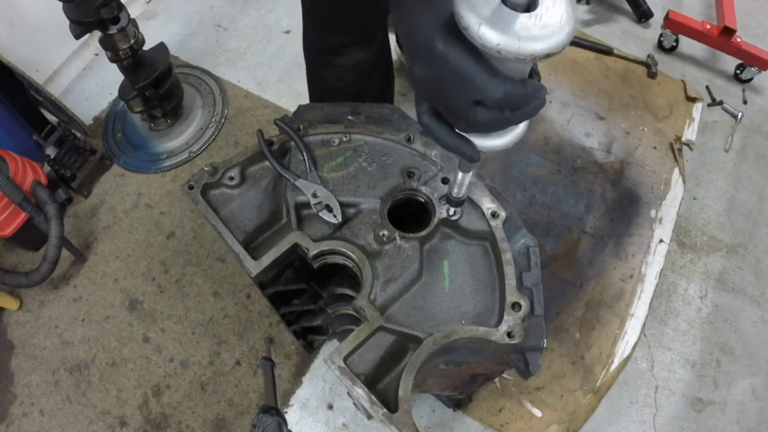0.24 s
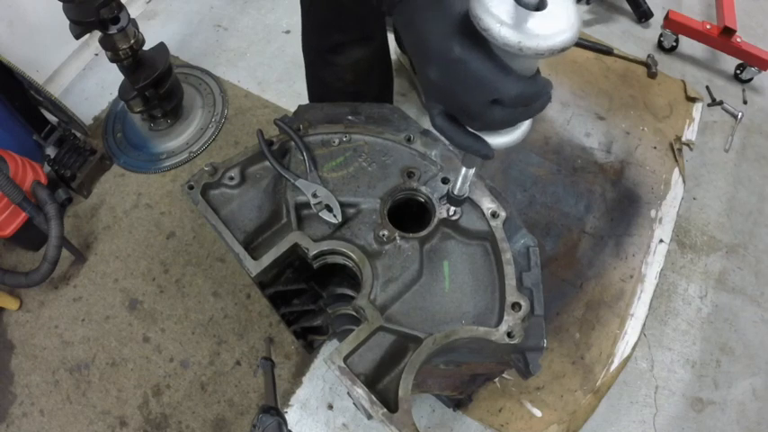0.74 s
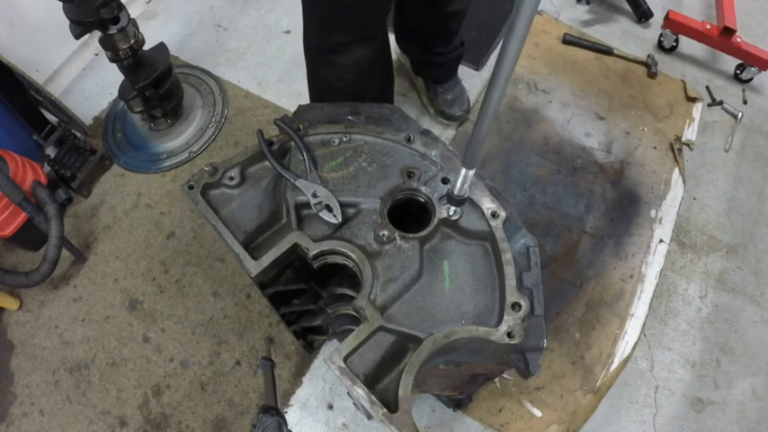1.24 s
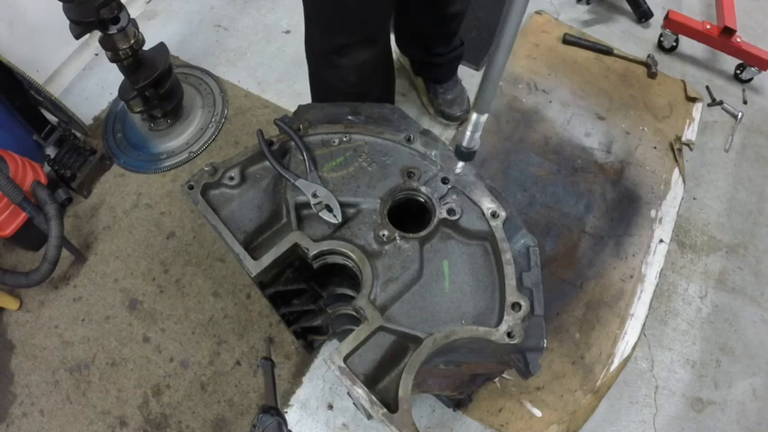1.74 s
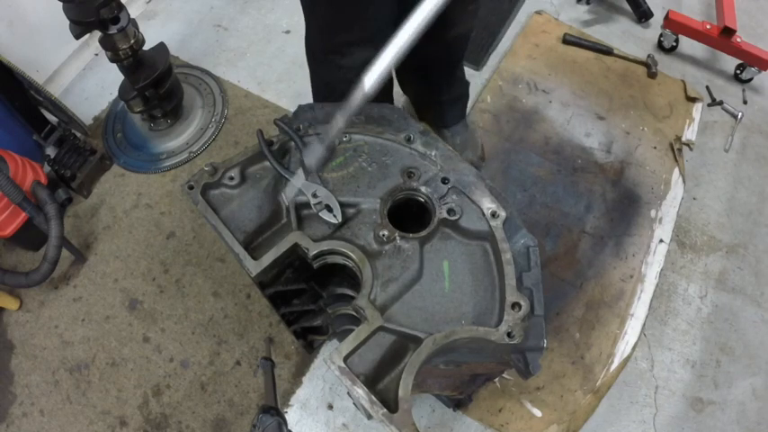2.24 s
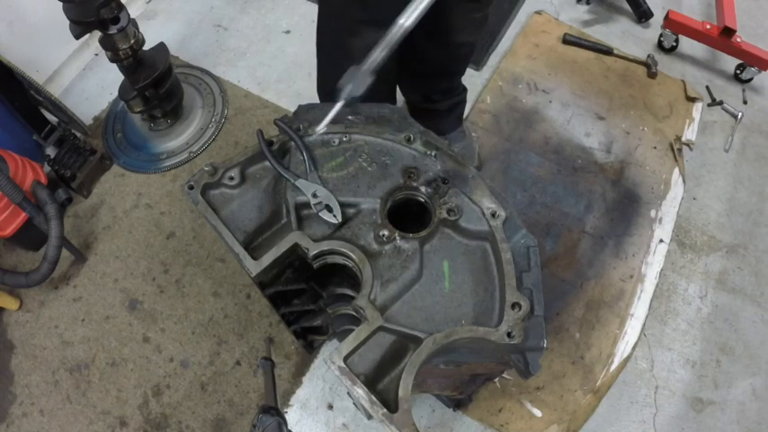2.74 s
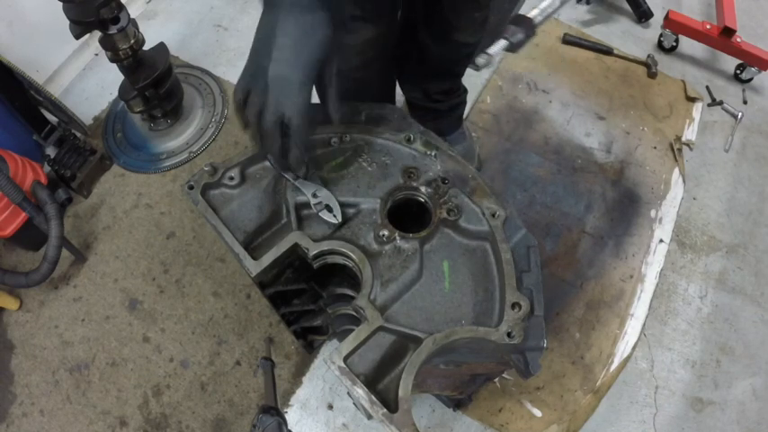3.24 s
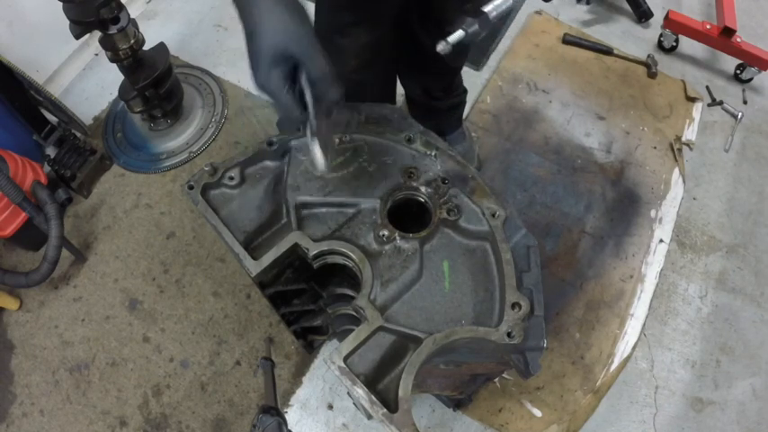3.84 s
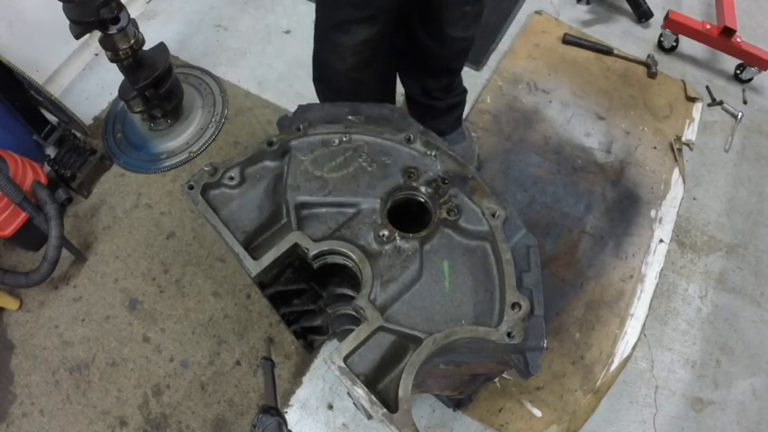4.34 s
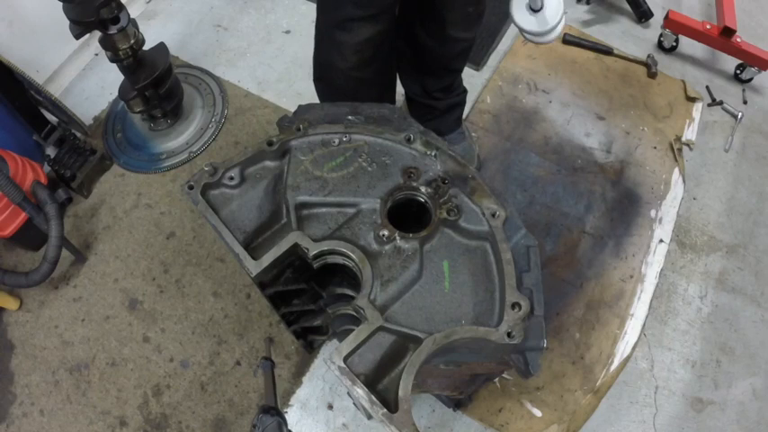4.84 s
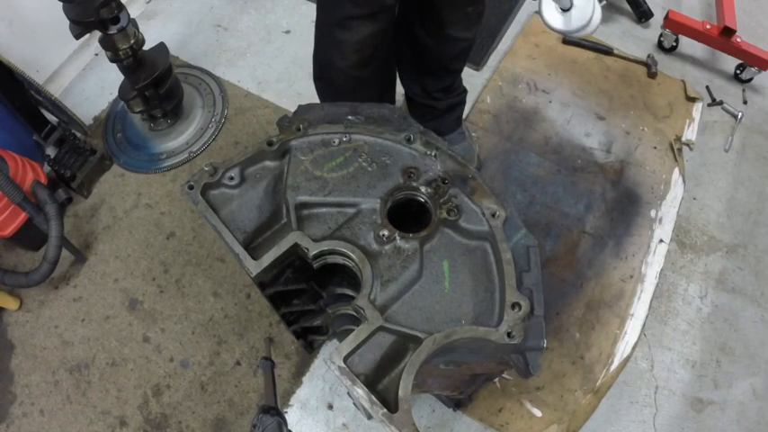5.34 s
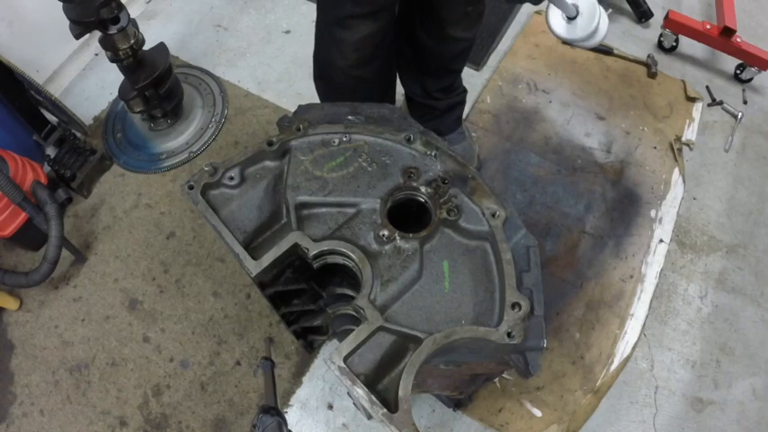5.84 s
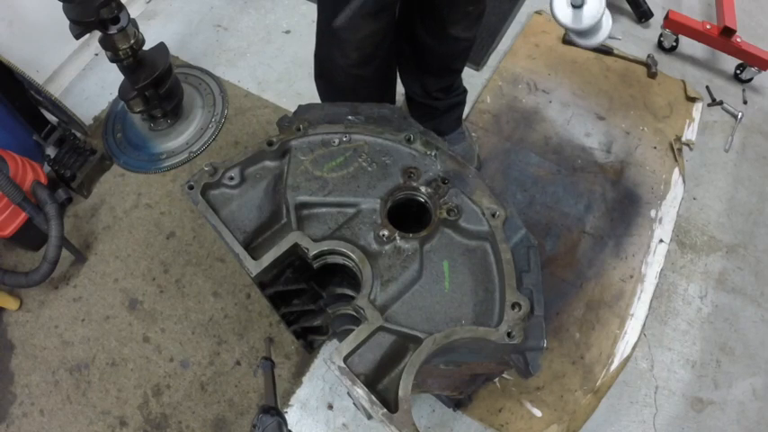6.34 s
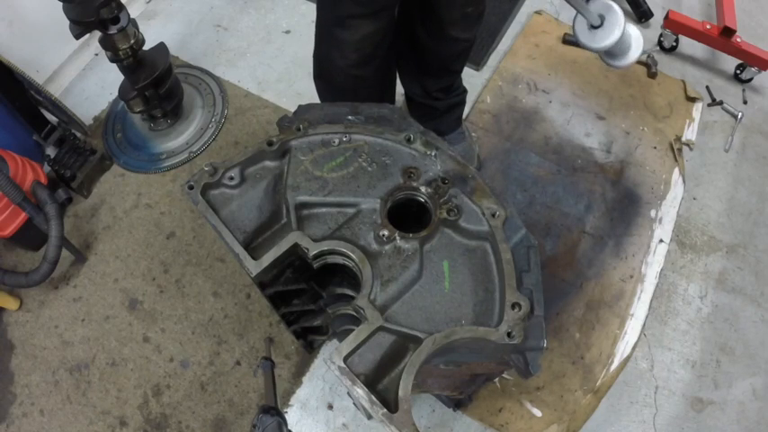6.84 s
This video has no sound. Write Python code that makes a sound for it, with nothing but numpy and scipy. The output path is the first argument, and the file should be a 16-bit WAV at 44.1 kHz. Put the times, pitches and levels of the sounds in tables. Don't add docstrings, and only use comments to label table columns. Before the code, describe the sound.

A low building hum and a very faint high whine run throughout a hard, reverberant workshop, heard close on a camera microphone. A tick and sleeve rustle open it, with small creases around 0.25 s. From about 0.6 s a weight scrapes softly on a rod, growing to a gritty, singing rub near 1.0 s, and slams at 1.17 s with a dull floor thud and ringing casting. Another scrape leads to the loudest, sharpest slam at 1.66 s, with clanks to 1.75 s; the level ducks and recovers over about a second. A tap at 1.9 s, a slide back, then a bright ringing clank with bounces at 2.38 s. Loose knocks and rattles fall at 2.75-2.9 s, a medium ringing tool clank at 3.43 s, a soft nudge at 3.68 s. Afterwards quiet rustling, glove drags, dry ticks and a short damped snap at 5.75 s, last clicks near 6.5 s, then hum.

```python
import sys
import numpy as np
from scipy import signal
from scipy.fft import rfft, irfft, next_fast_len
from scipy.io import wavfile
from scipy.ndimage import uniform_filter1d, map_coordinates

SR = 44100
rng = np.random.default_rng(int(sys.argv[2]) if len(sys.argv) > 2 else 0)


def master(y):
    cut = np.clip(np.atleast_2d(y).T, -1, 1)
    pcm = np.round(cut * 32767)
    wavfile.write(sys.argv[1], SR, pcm.astype(np.int16))


def ratio(d):
    e = np.asarray(d, float) / 20
    return 10 ** e


N = 313330


def colour(x, points, tilt_db=0.):
    hz, db = np.transpose(points)
    octave = np.log2(np.maximum(np.arange(513) * SR / 1024, 20))
    gain_db = np.interp(octave, np.log2(hz), db) + tilt_db * (octave - np.log2(3000))
    cepstrum = irfft(np.log(ratio(gain_db)))
    cepstrum[1:512] *= 2
    cepstrum[513:] = 0
    taps = irfft(np.exp(rfft(cepstrum)))
    return signal.fftconvolve(x, taps / np.sqrt(np.sum(taps ** 2)))[:len(x)]


def shaped(points):
    hz, db = np.transpose(points)
    size = next_fast_len(N)
    bins = np.maximum(np.arange(size // 2 + 1) * SR / size, 1)
    gain = ratio(np.interp(np.log(bins), np.log(hz), db))
    x = irfft(rfft(rng.standard_normal(size)) * gain, size)[:N]
    return x / np.std(x)


def walk(rate):
    hold = int(SR / rate)
    steps = np.repeat(rng.standard_normal(N // hold + 1), hold)
    return 1.2 * uniform_filter1d(uniform_filter1d(steps, hold), hold)[:N]


def add(out, s, sound):
    i = max(int(s * SR), 0)
    out[i:i + len(sound)] += sound[:N - i]


def strokes(rows, size=1):
    rows = np.array(rows)
    t = np.arange(0, N, size) / SR
    speed = np.array([np.interp(t, np.sort(row[:3]), [0, 1, 0]) for row in rows])
    return speed, rows[:, 3:4]


def effort(rows, power):
    speed, db = strokes(rows, size=8)
    energy = np.sum((ratio(db) * speed ** power) ** 2, axis=0)
    return np.repeat(np.sqrt(energy), 8)[:N]


def singing(hz, width, db):
    friction = rng.standard_normal(N) * ratio(3.8 * walk(40))
    mode = signal.lfilter(*signal.iirpeak(hz, hz / (.9 * width), SR), friction)
    mode = signal.lfilter(*signal.iirpeak(hz, hz / (5 * width), SR), mode)
    return ratio(db) * np.sqrt(width) * mode / np.std(mode) / 20


def bent(x, share):
    return map_coordinates(x, [np.arange(N) + np.cumsum(share)], order=1, mode="mirror")


def shop():
    # (frequency [Hz], level [dB per Hz])
    hum_spectrum = [(12, -31.5), (20, -1), (101, -3.5), (347, -13), (472, -14), (873, -18), (949, -16.5),
                    (1120, -21.5), (2390, -26), (2990, -28), (3840, -30.5), (4420, -32.5), (5850, -35.5),
                    (14300, -49), (16000, -67.5)]
    hum = ratio(-52 + .5 * walk(3.4)) * shaped(hum_spectrum)
    whine_db = -95.5 + 4.5 * walk(9)
    return hum + ratio(whine_db) * np.sin(2 * np.pi * 14200 * np.arange(N) / SR)


def room(x):
    # (frequency [Hz], t60 [s])
    room_t60 = [(300, 1), (1000, 0.73), (2500, 0.38), (5000, 0.49), (9000, 0.33), (14000, .22)]
    t = np.arange(SR) / SR
    hz, t60 = np.transpose(room_t60)
    tail = 0
    for centre in 120 * 2 ** np.arange(0, 7.1, .5):
        band = signal.butter(2, [centre / 2 ** .25, centre * 2 ** .25], "bandpass", fs=SR, output="sos")
        fall = np.log(1000) / np.interp(np.log(centre), np.log(hz), t60)
        echoes = signal.sosfilt(band, rng.standard_normal(SR))
        tail = tail + min(centre / 1200, 1) * echoes * np.exp(-fall * t)
    tail *= 1 - np.exp(-t / 0.001)
    return signal.fftconvolve(x, tail / np.sqrt(np.sum(tail ** 2)))[:N]


def sleeves():
    # (start [s], fastest [s], stop [s], level when fastest [dB])
    sleeve_moves = [(-.02, .001, 0.027, -53), (.15, .28, 0.34, -63.5), (.36, .43, 0.47, -59),
                    (2.93, 3.055, 3.3, -57), (4.1, 4.14, 4.2, -68), (4.2, 4.37, 5, -65.5),
                    (4.5, 4.63, 4.79, -62), (4.92, 4.98, 5.07, -59.5), (5.05, 5.3, 5.1, -68),
                    (5.37, 5.39, 5.46, -58), (4.84, 4.87, 4.9, -67.5), (5.72, 5.76, 5.8, -68),
                    (6.24, 6.25, 6.33, -67.5), (6.36, 6.378, 6.9, -71), (6.48, 6.5, 7.1, -70.5),
                    (6.54, 6.55, 6.6, -74)]
    crease_moves = [
        (.215, .235, 0.22, -64),
        (.25, .257, 0.24, -54),
        (.276, .286, 0.3, -56),
        (.3, .305, 0.35, -67),
        (.4, .42, 0.38, -76),
    ]
    drag_moves = [
        (2.88, 3.12, 5.1, -57),
        (3.7, 3.92, 3.96, -68.5),
        (4.0, 4.26, 4.4, -64),
        (4.93, 5.16, 5.37, -60.5),
        (5.22, 5.4, 5.57, -59.5),
    ]
    # (frequency [Hz], level [dB per Hz])
    cloth_spectrum = [(2240, -12.5), (3800, 9), (4640, -10), (6270, 9.5), (7740, -10), (10000, -4),
                      (14200, -11), (15500, -4)]
    stiff_spectrum = [(2000, -30), (3500, -2), (5000, -14), (6500, 2), (7800, -10), (9500, -4),
                      (11500, -13), (14000, -5), (15500, -10)]
    grip_spectrum = [(1000, -46), (1700, -22), (2210, 2.5), (2660, -9), (3590, -4.5), (4380, -12),
                     (6030, -22.5), (15000, -29)]
    cloth = effort(sleeve_moves, .92) * ratio(1.0 * walk(98)) * shaped(cloth_spectrum)
    creases = effort(crease_moves, .6) * ratio(2.5 * walk(300)) * shaped(stiff_spectrum)
    drag = uniform_filter1d(effort(drag_moves, 0.72), size=3000)
    return cloth + creases + drag * ratio(2.0 * walk(43)) * shaped(grip_spectrum)


def ticks():
    # (time [s], peak [dB], centre [Hz], 6 kHz region [dB], 12 kHz region [dB])
    clicks = [(0.0094, -45, 2610, 1, -8), (0.2565, -54, 2280, 1.5, 3), (2.7097, -47, 3580, 0, 7),
              (3.0772, -43, 2290, -40, -36), (4.1391, -52.5, 2195, 0, -20), (4.9727, -50, 3450, 4, -20),
              (5.3885, -45, 2190, -3.5, -12), (5.675, -45, 2800, -4, -31.5), (6.2475, -59, 2590, -5, -22),
              (6.3674, -48, 3360, -18.5, -22.5), (6.549, -44, 4000, -6, -21.5)]
    out, t = np.zeros(N), np.arange(1500) / SR
    for s, peak_db, hz, mid_db, top_db in clicks:
        points = [(hz / 3, -18), (hz / 1.4, -2), (hz, 0), (4800, mid_db - 18), (6800, mid_db),
                  (12000, top_db), (16000, top_db - 14)]
        click = colour(rng.standard_normal(len(t)) * np.exp(-t / 0.0034), points)
        add(out, s, ratio(peak_db - 9.5) * click / np.std(click[:100]))
    return out


def thumps():
    # (time [s], level [dB], frequency [Hz], t60 [s])
    knocks = [
        (1.172, -34.5, 51.67, 0.46),
        (1.658, -33, 150, 0.051),
        (1.658, -28, 260, 0.062),
        (1.659, -25, 640, .04),
        (2.384, -41, 400, 0.087),
    ]
    out, t = np.zeros(N), np.arange(SR) / SR
    for s, db, hz, t60 in knocks:
        add(out, s, ratio(db) * np.exp(-np.log(1000) * t / t60) * np.sin(2 * np.pi * hz * t))
    return out


def slide():
    # (start [s], fastest [s], stop [s], level when fastest [dB], modes under 3 kHz [dB])
    stroke_rows = [(.58, .62, 0.69, -58, -1.5), (.67, .71, 0.92, -61, -2), (0.927, 1.03, 1.7, -38, -1.75),
                   (1.082, 1.155, 1.16, -31, -0.5), (1.3, 1.392, 1.47, -47, 1.1),
                   (1.41, 1.47, 1.54, -43.5, -3), (1.549, 1.628, 1.657, -37.5, 0.6),
                   (1.931, 2.07, 2.12, -41.5, 1.5), (2.13, 2.16, 2.23, -54, 2),
                   (2.217, 2.35, 2.41, -36.5, -2.5), (2.857, 2.9, 2.97, -50.5, 4),
                   (3.376, 3.428, 3.35, -53.5, 9)]
    # (frequency [Hz], width [Hz], level [dB])
    weight_modes = [(875, 97, -12.5), (1600, 60, -12), (1800, 60, -7), (2395, 60, -10.5), (2655, 90, -2),
                    (3300, 110, -13), (4738, 80, -7), (5240, 27, -25.5), (5950, 62, -7.5),
                    (6500, 180, -21.5), (6940, 82, -19), (8706, 90, -27), (9600, 80, -34.5),
                    (10300, 90, -31.5), (11800, 110, -34.5), (13520, 100, -38.5)]
    # (frequency [Hz], level [dB per Hz])
    rub_spectrum = [(500, -13), (2000, 4.5), (4000, -4), (7000, -12.5), (8500, -19), (15000, -28)]
    # (time [s], lower mode [Hz], upper mode [Hz])
    place = [(.6, 2006, 3600), (.94, 1887, 3476), (1.0, 2146, 3750), (1.072, 1987, 3635),
             (1.13, 2199, 3623), (1.165, 1955, 3600), (1.4, 2250, 3730), (1.48, 2297, 3830),
             (1.556, 2170, 3872), (1.59, 1933, 3843), (1.625, 2168, 3600), (2.0, 2221, 3600),
             (2.039, 1895, 3560), (2.091, 2250, 3535), (2.25, 2001, 3616), (2.3, 2305, 3722),
             (2.371, 2109, 3600), (3.4, 2099, 3488)]
    groups = np.zeros((4, N))
    groups[0] = ratio(-8.5) * colour(rng.standard_normal(N) * ratio(1.5 * walk(120)), rub_spectrum)
    for hz, width, db in weight_modes:
        groups[np.searchsorted([3000, 5500, 6300], hz)] += singing(hz, width, db)
    mid_drift, drift = .01 * walk(14), .01 * walk(14)
    for i, share in enumerate([drift, mid_drift, .4 * drift, 1.8 * drift]):
        groups[i] = bent(groups[i], share)
    s, *tracks = np.transpose(place)
    for group, hz, width, db in zip(groups[:2], tracks, (70, 80), (-2, 3.5)):
        share = np.interp(np.arange(N) / SR, s, hz / hz.mean() - 1)
        group += bent(singing(hz.mean(), width, db), share)
    groups *= ratio(np.array([[-1, 0, 6.5, 5]]).T) / np.std(groups.sum(axis=0))
    low_rows = [(*times, db + low_db) for *times, db, low_db in stroke_rows]
    return effort(stroke_rows, .92) * groups[1:].sum(axis=0) + effort(low_rows, .92) * groups[0]


def blows(events, modes, spectrum, tilt_db, spread_ms):
    out, t = np.zeros((2, N)), np.arange(SR // 2) / SR
    hz, db, t60 = np.transpose(modes)[:, :, None]
    decay = np.exp(-np.log(1000) * t / np.clip(t60, .02, .55))
    short = t[:2048]
    for s, peak_db, chatter_ms, ring_db, room_db in events:
        push = np.exp(-short * 1000 / max(chatter_ms, .3)) * (1 - np.exp(-short / .0003))
        crack = colour(rng.standard_normal(2048) * push, spectrum, tilt_db)
        crack *= ratio(peak_db) / np.std(crack[:100])
        touch = np.repeat(rng.standard_normal((len(hz), 50)), len(t) // 50, axis=1)
        touch = uniform_filter1d(touch, size=441)
        fade = ratio(4.5 * touch * np.minimum(t / .04, 1)) * decay
        start = rng.standard_normal((len(hz), 1))
        ring = 0
        for near in range(3):
            split, size = rng.standard_normal((2, len(hz), 1))
            detune = near * split * 23.1 / 4000
            wave = np.sin(np.float32(2 * np.pi * hz * (1 + detune) * t + 9 * start))
            ring = ring + np.sum(ratio(db + 1.0 * size - 1.8 * near) * fade * wave, axis=0)
        ring *= 1 - np.exp(-t * 1000 / max(spread_ms, .1))
        ring *= np.minimum(20 * (t[-1] - t), 1)
        clank = ratio(peak_db + ring_db) * ring / np.std(ring[:400])
        clank[:2048] += crack
        add(out[0], s, clank)
        add(out[1], s, ratio(room_db) * crack)
    return out


def snap():
    events = [
        (5.7451, -34, 0.65, -10, -17),
        (5.748, -47.5, .9, -10, -17),
    ]
    modes = [(2970, 0, .03), (3640, -7, 0.043), (6860, -1, 0.038), (6610, -21, .15), (9140, -12, .03)]
    contact = [(300, -37), (1000, -20), (2100, -8.5), (2900, -2), (3700, -2.5), (4600, -29), (6800, -3),
               (8000, -18), (9100, -9), (11000, -23), (16000, -26)]
    return blows(events, modes, contact, .1, .6)


def rattle():
    events = [
        (1.911, -32, 2.5, 2, -13),
        (2.818, -29, 1.5, 2.5, -4),
        (2.863, -44.5, 3.1, 3, 2),
        (2.882, -43, 2.2, 4, -5),
        (2.9, -50.5, 2.4, -5, -8),
    ]
    modes = [(1795, -14, .12), (2250, -14.5, .06), (2646, 0.5, .15), (2720, -12, .17), (3200, -22, 0.24),
             (3600, -3.5, 0.19), (3990, -28.5, 0.305), (4730, -24, .2), (5900, -15.5, 0.056),
             (6700, -24, 0.096)]
    contact = [(180, -78), (300, -41.5), (2000, -19), (2650, -6.5), (3030, -27.5), (3640, -7),
               (4230, -33.5), (6100, -30), (14700, -65), (16000, -104)]
    return blows(events, modes, contact, 1.5, .6)


def tip_and_knocks():
    contact = [(120, -54), (450, -18), (900, -33), (1710, -9), (2020, -14.5), (2700, -8.5), (3690, -3),
               (4350, -22.5), (4600, -24.5), (6520, -12), (7410, -29.5), (11400, -33.5), (16000, -49)]
    knock = [
        (2.747, -25.5, 2.8, -6, -13.5),
        (2.76, -34, 1.9, -3, -18),
    ]
    knocked_modes = [(1848, -9, 0.094), (2220, -6, 0.05), (2704, 1, 0.11), (3435, -6, .11),
                     (3560, -6, 0.17), (4500, -14.5, 0.65), (5860, -8, 0.23), (5987, -10, 0.077),
                     (6970, -17, .1), (8920, -23, 0.22)]
    nudge = [
        (3.684, -41.5, 3.8, -8, -6.5),
    ]
    nudged_modes = [(2050, -12, 0.31), (2213, -7, .05), (2620, -7, .25), (2700, -8, .09), (3470, -6, .46),
                    (6584, -29, 0.26)]
    tip = [
        (3.4275, -21, 1.3, -13.5, -9),
        (3.429, -19.5, 2.2, -8.5, -14),
        (3.433, -29.5, 1.9, -7, -18),
        (3.4355, -22, 1.3, -12.5, -11.5),
    ]
    tipped_modes = [(955, -15, 0.59), (1771, -17, 0.32), (2270, -14, 0.27), (2676, 9.5, .12),
                    (2848, -7, .4), (2988, -16, .3), (3590, -1, 0.36), (3550, -3, 0.22), (3780, -13, .4),
                    (3900, -10, .23), (4750, -3.5, 0.42), (5900, -12.5, .25), (6400, -1, 0.31),
                    (6460, -5, 0.46), (6800, -16, 0.5), (8530, -5.5, 0.3), (9100, -7.5, 0.32),
                    (11300, -22, .22)]
    knocks = blows(knock, knocked_modes, contact, .4, .8) + blows(nudge, nudged_modes, contact, 1.5, 1.5)
    return knocks + blows(tip, tipped_modes, contact, .4, 2.5)


def fall_back():
    events = [
        (2.3828, -7, 1.8, -13.5, -6.5),
        (2.403, -20.5, 5.4, -11.5, -9.5),
        (2.418, -20, 1.3, -16.5, 7),
        (2.427, -30.5, 3.5, -9, 2),
    ]
    modes = [(1060, -9, 0.25), (1673, 8, 0.2), (2233, 0.5, 0.28), (2600, -16.5, 0.32), (2879, -36, 0.33),
             (3596, -37.5, 0.19), (3618, 2.5, 0.26), (4700, -1.5, .33), (4580, -1, 0.29),
             (5915, -20, 0.085), (5940, -18, 0.45), (6300, -2, 0.23), (6015, -4.5, 0.56), (6290, 1, 0.5),
             (6430, 4.5, 0.26), (7350, -24, 0.58), (8500, -8, 0.4), (9028, -7, 0.34), (9010, -11, 0.2),
             (10900, -5, .36), (12280, -21.5, 0.14), (12830, -16.5, 0.13), (13270, -9, 0.089),
             (14210, -31, 0.27)]
    contact = [(120, -56), (200, -13), (1250, -15), (1650, -8.5), (2250, -5), (3690, 3), (4270, -7.5),
               (6760, -0.5), (7680, -17.5), (9060, -2.5), (10900, -8), (12400, -19.5), (14600, -17),
               (16000, -30)]
    return blows(events, modes, contact, .6, 3.4)


def pulls():
    contact = [(59, -56), (100, -22), (1200, -13), (1900, -3), (3540, -0.5), (4380, -10.5), (6290, -2),
               (7940, -13), (8830, -8), (10700, -13), (12400, -19.5), (15000, -21), (16000, -31.5)]
    first = [
        (1.169, -15, 0.84, -23.5, -8.5),
        (1.1705, -6.5, 3.7, -16.5, -12),
        (1.1755, -11, 4.1, -22, -17.5),
    ]
    seated_modes = [(1035, -13, 0.65), (1320, -5, 0.45), (1674, -9.5, .25), (1975, -3, .34),
                    (2240, 3, 0.46), (2560, 1.5, .3), (2673, -1.5, .3), (3130, -10.5, .3), (3434, 0, 0.32),
                    (3440, -3.5, 0.28), (3620, 2, .35), (3900, 1, .42), (3755, -3.5, .3), (4730, 3.5, .45),
                    (5370, -15.5, .3), (5680, -14, .35), (6094, -6, .26), (6643, -14.5, .4),
                    (6415, -10, 0.28), (7100, -15, .3), (8700, -3.5, .08), (8532, -16, .45),
                    (9033, -12, .34), (10930, -10, .15)]
    second = [
        (1.6545, -32, 1.5, -20.5, -17.5),
        (1.6563, -3.0, 2.6, -18, -14.5),
        (1.682, -20.5, 4.1, -6, -20.5),
        (1.73, -26, 1.8, -10.5, -4),
        (1.746, -28.5, 2.3, -8.5, -8),
    ]
    tearing_modes = [(1250, -21.5, .3), (1650, -18.5, .26), (2270, -16.5, .45), (2646, -12, .3),
                     (2970, -17.5, 0.13), (3428, -4.5, .1), (3540, 3.5, 0.13), (3700, -5.5, 0.62),
                     (3980, -5, .33), (4000, -5.5, .3), (4630, -8.5, .2), (4720, -12.5, .4),
                     (6050, -18, .3), (6170, -9, .3), (6300, -10, .1), (8440, -12, .2), (8560, -18, 0.32),
                     (8995, -15, 0.18), (9550, -24.5, .3), (10590, -3.5, .2), (10870, -12, 0.37),
                     (11400, -21.5, .25), (12500, -21.5, .2), (14120, -30, .2)]
    return blows(first, seated_modes, contact, -.8, 3.4) + blows(second, tearing_modes, contact, .3, 3.4)


def scene():
    direct, send = pulls() + fall_back() + tip_and_knocks() + rattle() + snap()
    small = ticks() + slide()
    walls = room(send + ratio(-18.5) * direct + ratio(-8) * small)
    return (direct + small + walls + thumps() + shop() + sleeves())[None]


def top_cut(x):
    return signal.sosfilt(signal.butter(12, 16650, fs=SR, output="sos"), x)


def record(dry):
    # (start [s], deepest [s], recovered [s], depth [dB])
    gain_moves = [
        (1.15, 1.4, 1.63, -2.5),
        (1.637, 1.641, 2.06, -6.5),
        (1.64, 1.9, 2.9, -5.5),
        (2.38, 2.55, 2.79, -4),
        (2.75, 3.1, 6.3, 1),
    ]
    share, db = strokes(gain_moves)
    x = np.clip(dry * ratio(np.sum(share * db, axis=0)), -.9, .9)
    low_pass = signal.cheby1(14, .5, 15350, fs=SR, output="sos")
    edge = signal.butter(4, [15900, 16600], "bandpass", fs=SR, output="sos")
    mix = signal.sosfilt(low_pass, x) + ratio(-12) * signal.sosfilt(edge, x * np.abs(x))
    return top_cut(mix)


dry = scene()
out = record(dry)
master(out)
```